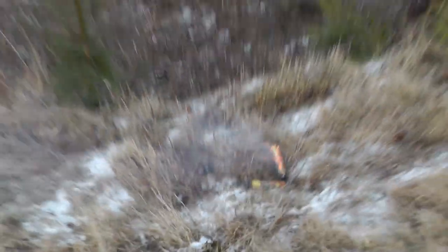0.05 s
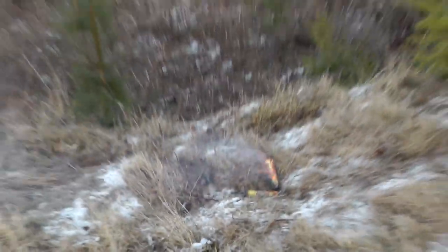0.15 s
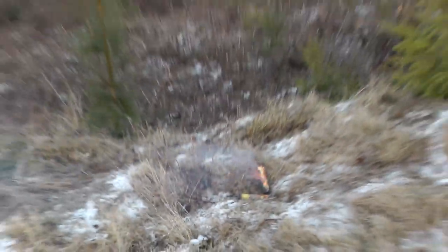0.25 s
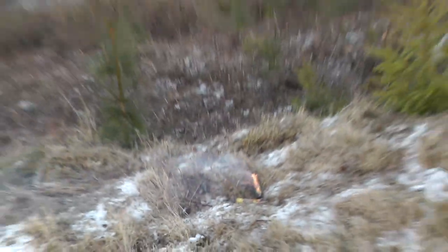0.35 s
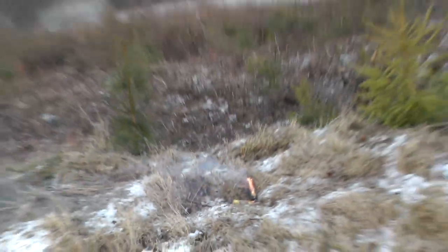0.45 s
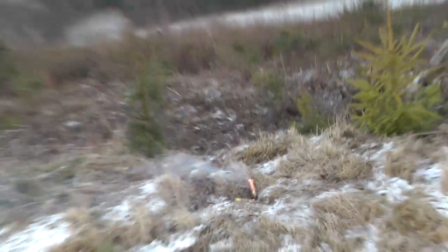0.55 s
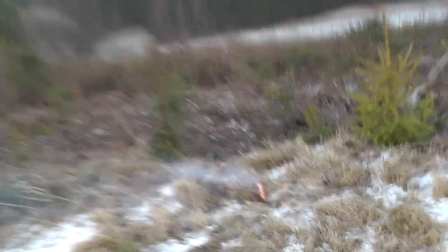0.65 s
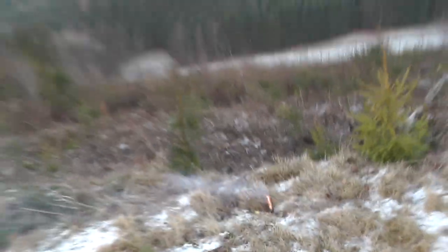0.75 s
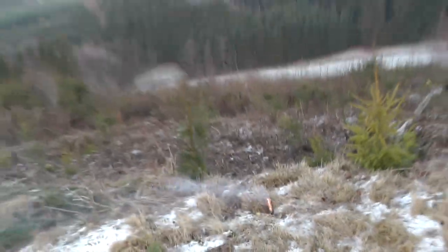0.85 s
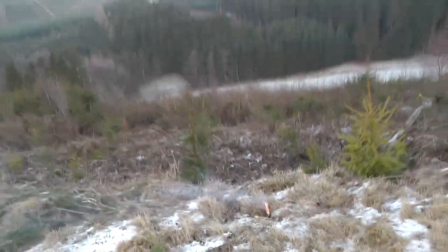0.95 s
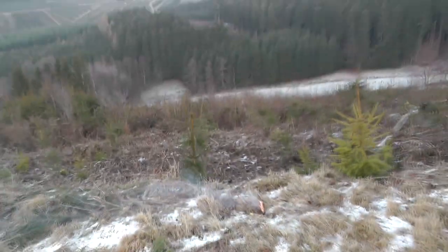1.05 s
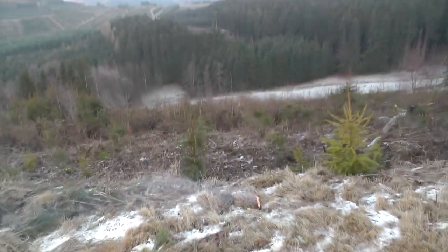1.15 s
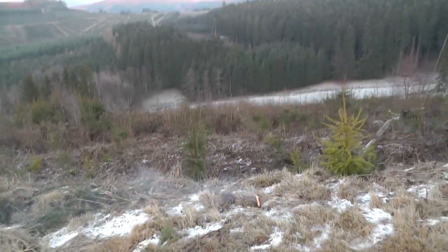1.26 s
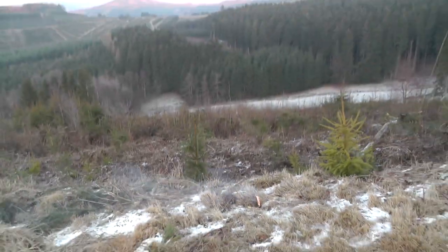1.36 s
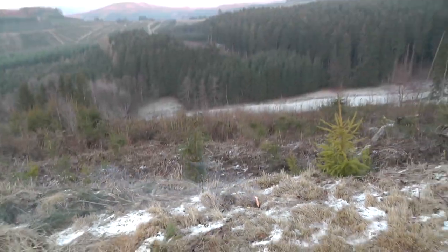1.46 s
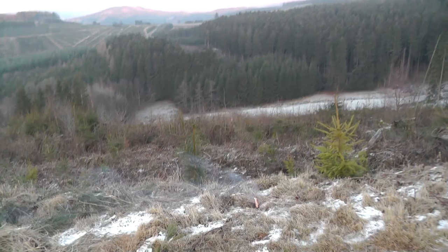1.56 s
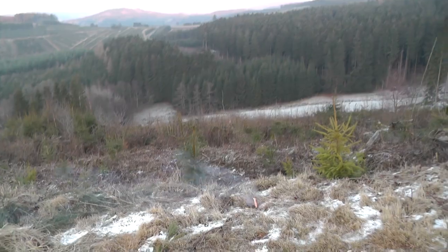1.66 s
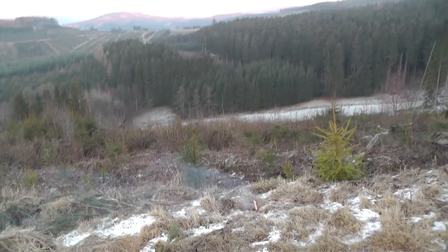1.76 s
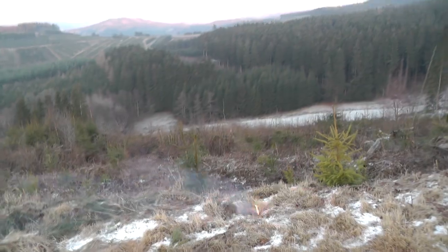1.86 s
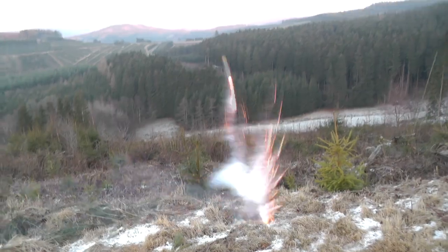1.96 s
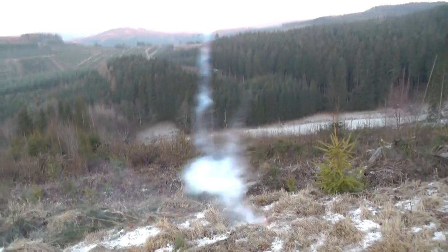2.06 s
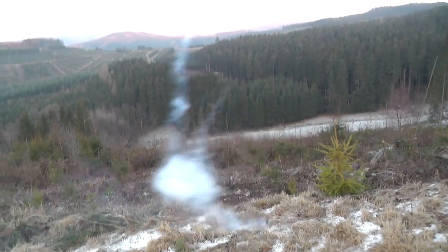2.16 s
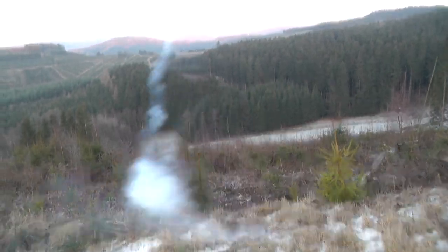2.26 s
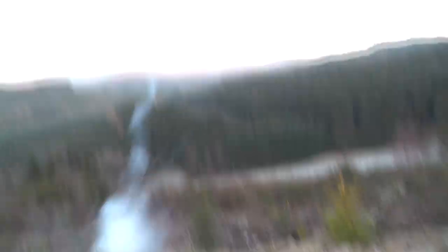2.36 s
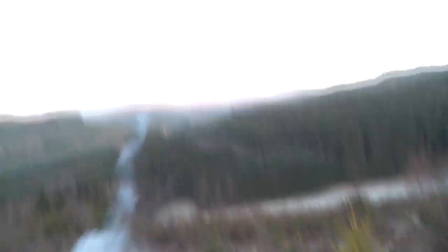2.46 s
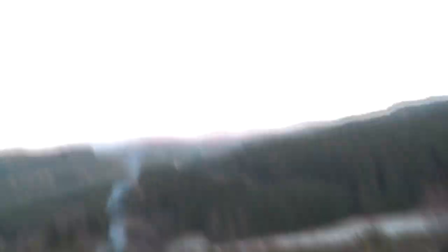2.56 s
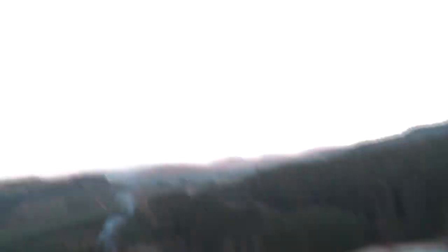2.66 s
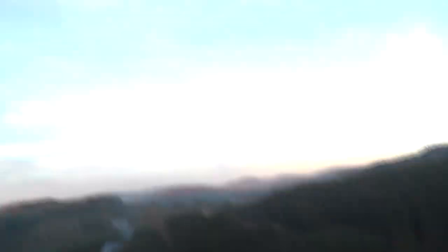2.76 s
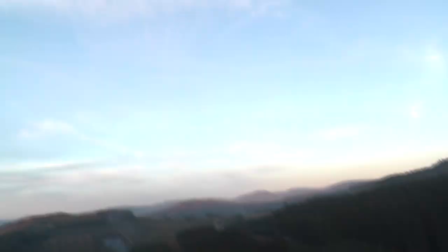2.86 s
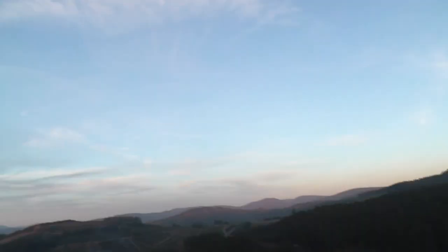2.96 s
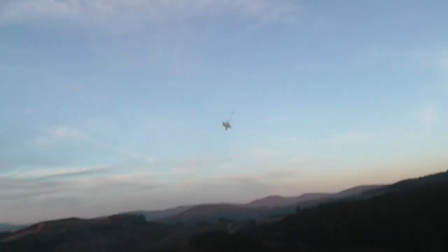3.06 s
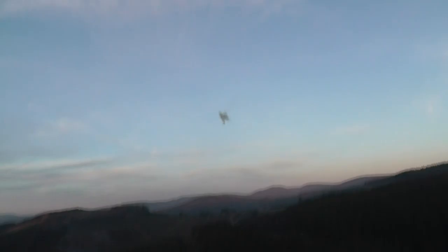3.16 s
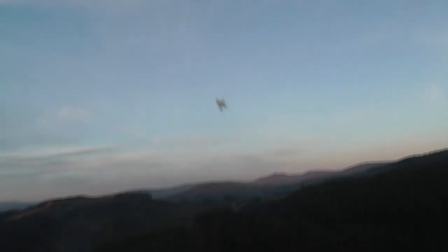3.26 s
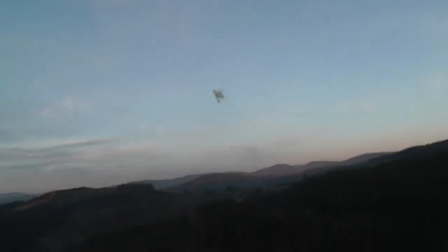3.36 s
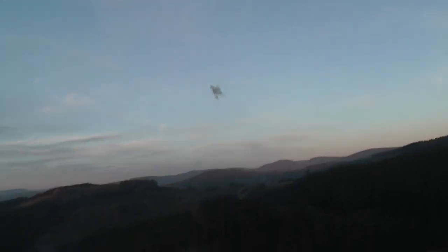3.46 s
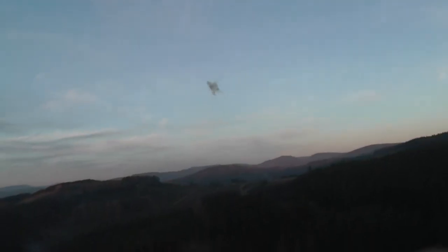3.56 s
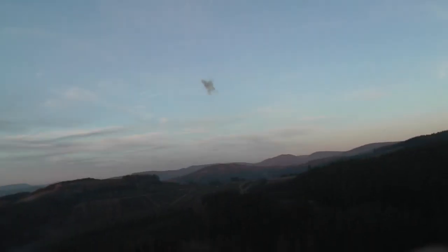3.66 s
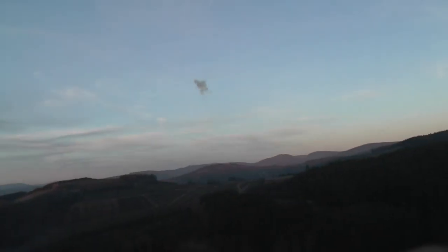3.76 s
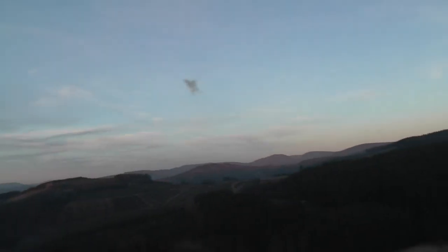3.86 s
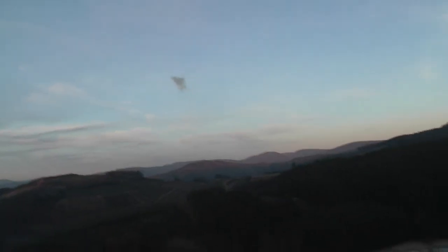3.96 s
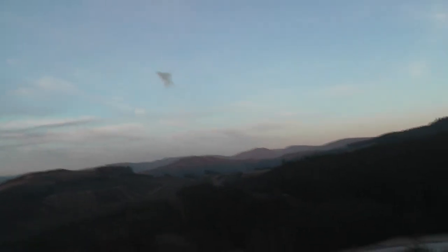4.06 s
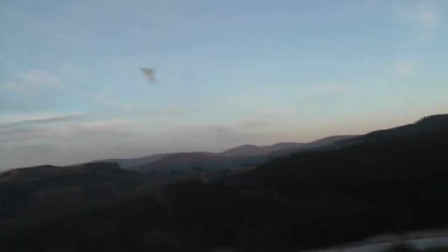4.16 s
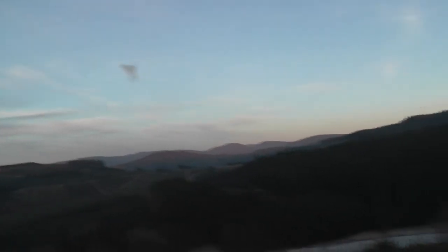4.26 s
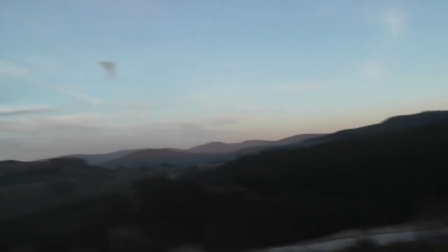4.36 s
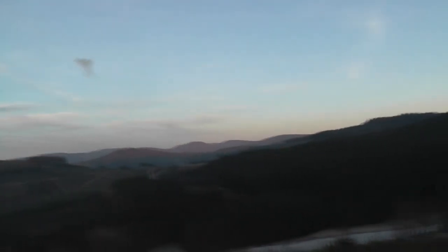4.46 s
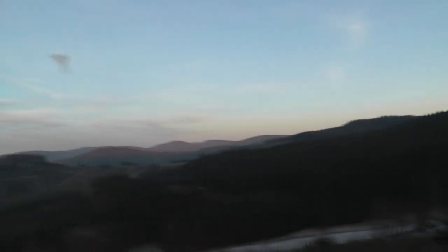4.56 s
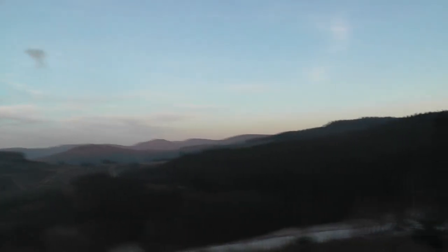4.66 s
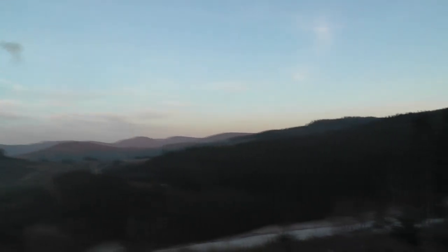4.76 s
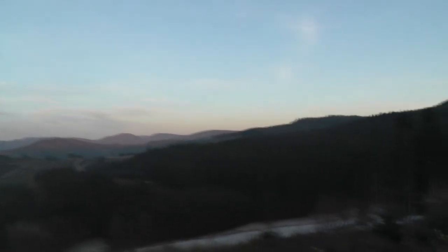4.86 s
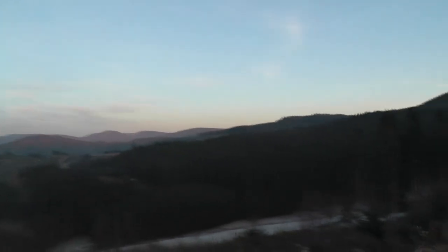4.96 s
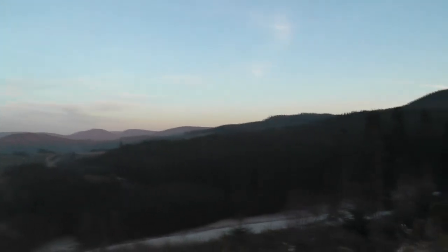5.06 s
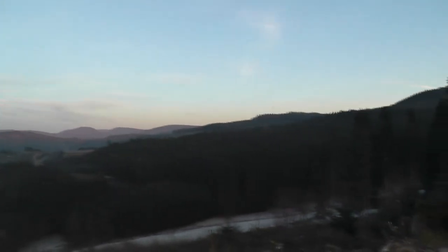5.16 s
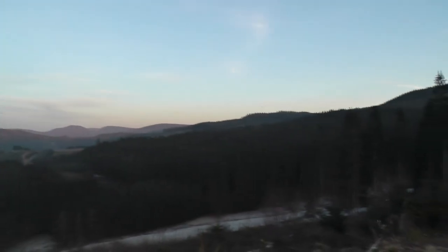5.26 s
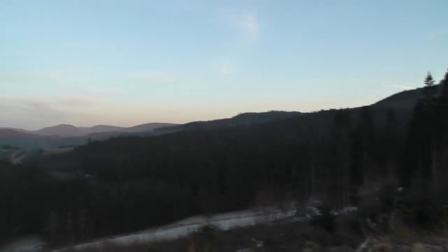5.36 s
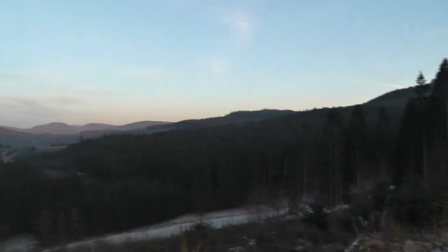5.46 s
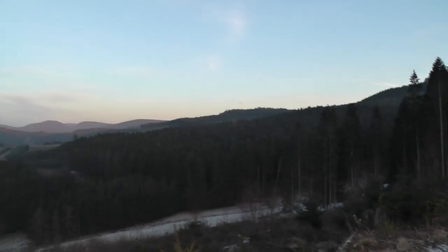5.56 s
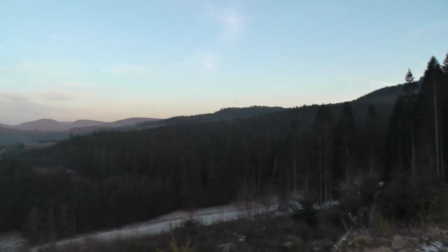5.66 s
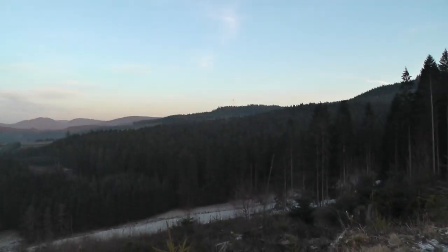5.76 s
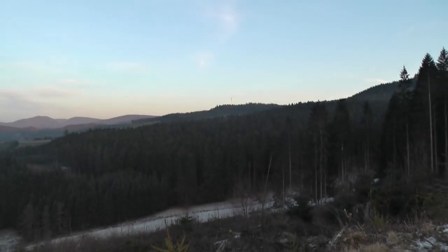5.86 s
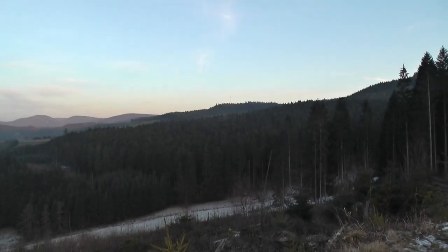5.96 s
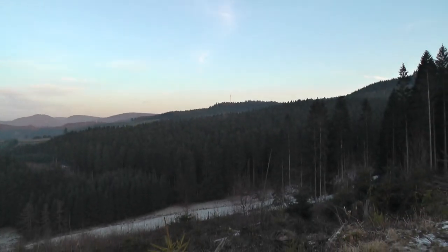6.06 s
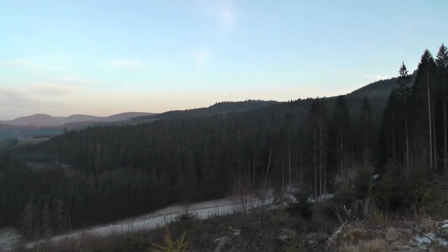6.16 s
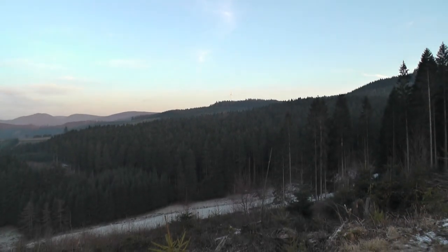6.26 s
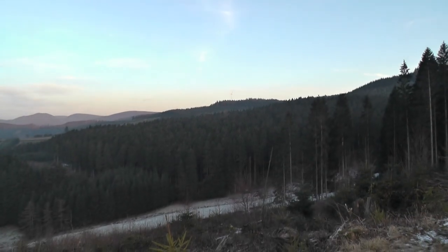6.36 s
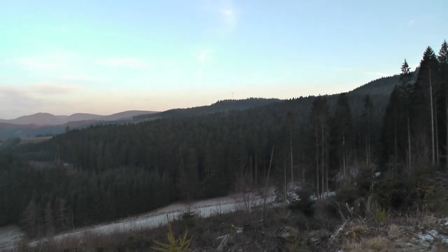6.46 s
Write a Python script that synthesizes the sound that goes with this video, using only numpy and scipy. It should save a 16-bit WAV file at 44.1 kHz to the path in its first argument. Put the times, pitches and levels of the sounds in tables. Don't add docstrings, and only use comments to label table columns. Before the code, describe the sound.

Hissing fuse and crunching steps outdoors, a short hard lift bang, a second later a huge overloaded explosion with a long, dulling echo across forested slopes.

```python
import sys
import numpy as np
from scipy import signal
from scipy.fft import rfft, irfft, next_fast_len
from scipy.io import wavfile
from scipy.ndimage import map_coordinates

SR = 44100
rng = np.random.default_rng(int(sys.argv[2]) if len(sys.argv) > 2 else 0)


def to_wav(s):
    ch = np.atleast_2d(s).T
    pcm = np.round(np.clip(ch, -1, 1) * 32767)
    wavfile.write(sys.argv[1], SR, pcm.astype(np.int16))


def invert_db(x):
    u = np.asarray(x, float) / 20
    return 10 ** u


N = 287355
t = np.arange(N) / SR


def unit(x):
    return x / np.sqrt(np.mean(x ** 2) + 1e-20)


def along(points, hz):
    f, v = np.transpose(points)
    return np.interp(np.log(hz + 1), np.log(f + 1), v)


def curves(rows):
    s, *cols = np.transpose(rows)
    return [np.interp(t, s, c) for c in cols]


def during(rows):
    return invert_db(curves(rows)[0]) * (t > rows[0][0]) * (t < rows[-1][0])


def swells(rows):
    power = 0
    for s, db, rise, fall in rows:
        away = np.maximum((s - t) / abs(rise), (t - s) / abs(fall))
        power = power + invert_db(db - 20 * away) ** 2
    return np.sqrt(power)


def sides(db):
    return invert_db(np.array([db, -db]) / 2)


def wobble(rate):
    knots = rng.standard_normal(int(N * rate / SR) + 4)
    return map_coordinates(knots, [t * rate])


def spread(mid, side, turn):
    return np.cos(turn) * mid + np.sin(turn) * np.array([side, -side])


def rush(spectrum, alike, spiky_db=0):
    sputter = np.repeat(rng.standard_normal(N // 32 + 1), 32)[:N]
    white = rng.standard_normal((2, N)) * invert_db(spiky_db * sputter)
    m = next_fast_len(N + 8192)
    colour = invert_db(along(spectrum, np.fft.rfftfreq(m, 1 / SR)))
    mid, side = irfft(rfft(white, m) * colour, m)[:, :N]
    return unit(spread(mid, side, np.arccos(np.clip(alike, -1, 1)) / 2))


def causal(db):
    cepstrum = irfft(np.log(invert_db(np.maximum(db, np.max(db) - 110))))
    half = len(cepstrum) // 2
    cepstrum[1:half] *= 2
    cepstrum[half + 1:] = 0
    pulse = irfft(np.exp(rfft(cepstrum)))[:half]
    return pulse / np.linalg.norm(pulse)


def shocks(rows):
    out = np.zeros((2, N))
    ms = np.arange(SR // 20) / SR * 1000
    for s, db, push, rise, pan_db in rows:
        wave = (1 - ms / push) * np.exp(-ms / push) * (1 - np.exp(-ms / rise))
        out[:, round(s * SR):][:, :len(ms)] += invert_db(db) * sides(pan_db)[:, None] * wave
    return signal.lfilter(*signal.butter(1, 4, "high", fs=SR), out)


# start_s [s], peak_db [dB over full scale], push_ms [ms], rise_ms [ms], left_minus_right_db [dB]
BURST_FRONTS = [(3.1715, 30, .4, .02, 0), (3.1733, 27, .42, .03, -3), (3.1744, 23, .6, .3, 2),
                (3.1754, 24, .6, .03, 0), (3.1783, 19, 1.0, .5, 0), (3.1808, 14, .8, .25, 1),
                (3.1821, 10, .6, .25, 3), (3.1833, 10, 1.2, .3, -3), (3.1861, 8, .8, .4, 0),
                (3.6974, 2, .4, .13, -5), (3.7003, -5, .4, .2, -6), (3.771, -2, .4, .15, -7),
                (3.9085, -8, .35, .12, -9)]


def burst():
    return shocks(BURST_FRONTS)


# start_s [s], peak_db [dB], push 1 or pull -1 [sign]
CLEAR_TRUNKS = [(3.1964, -3, 1), (3.3172, -5, -1), (3.3253, -4, -1), (3.3571, -1.5, -1), (3.5439, -8, -1),
                (3.5773, -5, -1), (3.6299, -8.5, 1), (3.6974, -2, 1), (3.7099, -5, 1), (3.7283, -3.5, 1),
                (3.7595, -2, 1), (3.771, -3, 1), (3.7801, -2.5, 1), (3.8179, -4, 1), (3.8437, -4, -1),
                (3.8982, -3, 1), (3.908, -2.5, 1), (3.9614, -5.5, -1), (4.0901, -5, 1), (4.1358, -5.5, -1),
                (4.1498, -5, 1), (4.1943, -6, 1), (4.3549, -2, 1), (4.4327, -4, 1), (4.779, -4, 1),
                (4.801, -5, -1), (5.004, -4, 1), (5.019, -3.5, 1), (5.969, -10, 1), (6.073, -11, 1)]
# start_s [s], end_s [s], trunks_per_s [1/s]
TREE_STANDS = [(3.19, 3.6, 20), (3.345, 3.365, 200), (3.612, 3.634, 140), (3.71, 3.82, 70),
               (3.83, 3.85, 160), (3.87, 3.93, 90), (3.947, 3.973, 160), (4.015, 4.1, 60),
               (4.135, 4.16, 130), (4.177, 4.24, 70)]


def trunks(pan_db):
    out = np.zeros((2, N))
    rows = list(CLEAR_TRUNKS)
    for start, end, rate in TREE_STANDS:
        draws = rng.random((int((end - start) * rate), 3))
        for k, (late, size, sign) in enumerate(draws):
            level_db = -7.5 + 3.5 * (size - .5)
            rows.append((start + (k + late) / rate, level_db, .7 - sign))
    for (s, db, sign), chance in zip(rows, rng.standard_normal(len(rows))):
        at = round(s * SR)
        trunk_pan_db = pan_db[at] - 1.5 + 1.5 * chance
        out[:, at] += np.sign(sign) * invert_db(db - 2.0) * sides(trunk_pan_db)
    return out


# time_s [s], level_db [dB], left_minus_right_db [dB]
YOUNG_TREES = [(3.2, -12.5, 0), (3.25, -15.3, -0.5), (3.33, -15.3, -0.5), (3.48, -16.6, -4),
               (3.63, -20.5, -3), (3.69, -25, -4)]
# time_s [s], level_db [dB], left_minus_right_db [dB]
FAR_HILLS = [(3.705, -18, -8.5), (3.9, -20, -5), (4.05, -16.5, -6), (4.45, -12.5, -2.5), (4.65, -14, -1.5),
             (5.35, -14.8, -1), (5.85, -22, 1), (5.98, -21, 0.5), (6.5, -28, 1.5)]
# time_s [s], path [-0.07 to 2.27, in the units of AIR_LOSS]
AIR_PATH = [(3.18, -.07), (3.72, .5), (4.1, .77), (4.5, 1.01), (5, 1.36), (5.5, 2), (6.5, 2.27)]
# pitch_hz [Hz], level_db [dB per Hz]
BLAST_COLOUR = [(40, -38), (110, -17), (180, -4), (300, -1), (560, 1), (850, -1), (1050, -5.5), (1350, -3),
                (1800, -7), (2500, -11), (5000, -17), (10000, -25), (14000, -31), (17000, -44)]
# pitch_hz [Hz], loss_db [dB per unit of path]
AIR_LOSS = [(600, 1), (850, 5), (1100, 7.5), (1700, 11), (2500, 18.5), (3500, 27), (5000, 37.5),
            (7000, 43.5), (10000, 66), (16000, 54)]
# pitch_hz [Hz], share [0-1]
THIN_TREE_LOSS = [(250, 1.0), (400, 0.85), (600, 0.02)]
# pitch_hz [Hz], level_db [dB]
TRUNK_COLOUR = [(100, -13.5), (300, -4.5), (700, -3), (1500, -6.5), (4000, -8.5), (16000, -13)]


def echoes():
    level_db, pan_db = curves(YOUNG_TREES + FAR_HILLS)
    path, = curves(AIR_PATH)
    bass_db = np.where(t < 3.7, np.clip(36 * (3.22 - t), -8.5, 0), -.7)
    after = np.maximum(t - BURST_FRONTS[3][0], 0)
    level_db = level_db + 6 * np.exp(-after / 0.0027)
    clumps_db = .45 * wobble(20) + (.9 + .9 * np.exp(-after / .8)) * wobble(130)
    turn = 0.15 + 0.48 * np.exp(-after / 0.77)
    mid, side = rng.standard_normal((2, N))
    leaves = spread(mid, side, turn)
    leaves = leaves * invert_db(level_db + clumps_db - 0.06) * sides(pan_db) * (after > 0)
    solid = trunks(pan_db)

    hz = np.fft.rfftfreq(2048, 1 / SR)
    block = 1536
    out = np.zeros((2, N + 4096))
    for i in range(round(BURST_FRONTS[0][0] * SR), N, block):
        colour_db = along(BLAST_COLOUR, hz) - path[i] * along(AIR_LOSS, hz)
        colour_db = colour_db + bass_db[i] * along(THIN_TREE_LOSS, hz)
        rustle = causal(colour_db)
        knock = causal(colour_db + along(TRUNK_COLOUR, hz))
        knock = knock / np.max(knock)
        part = signal.fftconvolve(leaves[:, i:i + block], rustle[None], axes=1)
        part += signal.fftconvolve(solid[:, i:i + block], knock[None], axes=1)
        out[:, i:i + part.shape[1]] += part
    return out[:, :N]


# start_s [s], peak_db [dB over full scale], push_ms [ms], rise_ms [ms], left_minus_right_db [dB]
LIFT_FRONTS = [(1.9676, 6, 1.0, .5, 0), (1.9701, 8, .8, .4, 0), (1.9728, 5, .35, .05, 0),
               (1.9752, -1, .5, .2, 0), (1.9784, 15, .6, .05, 0), (1.9802, 6, 1.1, .15, 0),
               (1.9821, -1, 1.3, .2, 0)]
# time_s [s], level_db [dB]
FLAME_LEVEL = [(1.948, -37), (1.956, -41), (1.967, -19), (1.9695, -11), (1.9788, -5), (1.9797, -33),
               (1.988, -42), (1.997, -39), (2.02, -86)]
# pitch_hz [Hz], level_db [dB per Hz]
FLAME_COLOUR = [(300, -28), (800, -5.5), (2200, -0.5), (4500, -8.5), (7000, -3.5), (11000, -12.5),
                (16000, -16)]
# delay_s [s], level_db [dB], left_minus_right_db [dB]
BACK_SLOPE = [(.0166, -32, 14), (.0128, -33, -8)]
# pitch_hz [Hz], level_db [dB per Hz]
RUMBLE_COLOUR = [(80, -30), (170, -7), (300, -4), (450, 0), (900, -14), (2500, -18), (6000, -44)]


def lift():
    fronts = shocks(LIFT_FRONTS)
    flame = during(FLAME_LEVEL) * rush(FLAME_COLOUR, 0.78, spiky_db=4.5)
    after = np.maximum(t - LIFT_FRONTS[-1][0], 0)
    rumble_gain = invert_db(-18 - 60 * after / 0.062) * (after > 0)
    rumble = rumble_gain * rush(RUMBLE_COLOUR, 0.79)
    answer = np.zeros((2, N))
    for s, db, pan_db in BACK_SLOPE:
        answer += invert_db(db) * sides(pan_db)[:, None] * np.roll(fronts, round(s * SR), axis=1)
    return fronts + flame + rumble + answer


# time_s [s], level_db [dB]
FUSE_LEVEL = [(0, -37), (.88, -38.5), (1.6, -41.5), (1.95, -47.5)]
# pitch_hz [Hz], level_db [dB per Hz]
FIZZ_COLOUR = [(710, -48.5), (1200, -11), (1510, -4.5), (1640, -6), (1890, -4.5), (2730, -5.5), (3700, -7),
               (6720, -2), (12700, -4.5), (16000, -11)]
# peak_s [s], level_db [dB above the hiss]
SPARK_SPURTS = [(.93, 2.2), (1.36, 2.5), (1.45, 4.5), (1.68, 2.5), (1.86, 2)]


def fuse():
    rise_s, fall_s = 0.033, 0.11
    spurt_db = 0
    for s, db in SPARK_SPURTS:
        away = np.maximum((s - t) / rise_s, (t - s) / fall_s)
        spurt_db = spurt_db + db * np.exp(-away)
    flicker_db = 0.68 * wobble(12.8)
    return during(FUSE_LEVEL) * invert_db(spurt_db + flicker_db) * rush(FIZZ_COLOUR, 0.94, spiky_db=1.0)


# start_s [s], level_db [dB], length_s [s], pitch_hz [Hz], spread [octaves]
BOOT_STEPS = [(0.175, -38.5, 0.06, 520, 1.43), (0.24, -49, 0.05, 1800, 0.84), (0.36, -41, 0.014, 1010, 1.4),
              (0.746, -37, 0.052, 1150, 0.8), (0.87, -38, 0.076, 1300, 0.6), (0.944, -43, 0.041, 350, 0.71),
              (0.979, -44, .02, 1190, 0.44), (1.153, -43, 0.028, 1190, 0.75),
              (1.246, -39.5, .016, 320, 0.6), (1.434, -41, 0.038, 1110, 1.24),
              (1.628, -37.5, 0.03, 620, 0.9), (1.661, -45.5, 0.045, 1490, 1),
              (2.122, -49.5, 0.059, 1300, 0.72), (2.142, -54.5, 0.073, 10000, .4),
              (2.208, -44, 0.018, 553, 0.32), (2.301, -50.5, 0.098, 1700, 0.52),
              (2.534, -37, 0.0066, 1200, 0.74), (2.545, -42, .13, 1180, 0.93),
              (2.679, -35.5, .025, 530, 0.55), (2.699, -33, 0.02, 1450, 0.22),
              (2.684, -47, .045, 4470, 0.5), (2.723, -40, 0.0077, 1100, 0.76),
              (2.736, -43, 0.013, 1500, .3), (3.541, -43, 0.035, 10000, .3)]


def steps():
    out = np.zeros((2, N + 4096))
    u = np.arange(400) / SR
    for s, db, length, hz, octaves in BOOT_STEPS:
        count = int(np.clip(25 + 4000 * length, 5, 300))
        where, later, pitch, size, pan = rng.random((5, 300))[:, :count]
        f = hz * 2 ** (0.594 * octaves * np.log(pitch / (1 - pitch)))
        f = np.clip(f, 80, 13000)[:, None]
        life = u * f / 0.92
        strength = (-np.log(size[:, None])) ** 0.78 * np.sqrt(f / hz)
        grains = np.sin(2 * np.pi * f * u) * life * np.exp(-life) * strength
        begin = (length * where * (.8 + .2 * later) * SR).astype(int)
        at = begin[:, None] + np.arange(len(u))
        scale = invert_db(db) * np.sqrt(length * SR / np.sum(grains ** 2))
        for side, gain in zip(out, sides(-1.5 + 14 * (pan - .5))):
            crunch = np.bincount(at.ravel(), (grains * gain[:, None]).ravel())
            side[round(s * SR):][:len(crunch)] += scale * crunch
    return out[:, :N]


# start_s [s], peak_db [dB], left_minus_right_db [dB]
STALK_SNAPS = [(0.242, -24, -1.5), (0.366, -23, -1.0), (0.777, -21, -5.0), (1.251, -30, 0.5),
               (2.532, -24, -3.5)]


def stalks():
    push_ms, rise_ms = .2, .05
    return shocks([(s, db + 7, push_ms, rise_ms, pan_db) for s, db, pan_db in STALK_SNAPS])


# peak_s [s], level_db [dB], rise_s [s], fall_s [s]
GRASS_BRUSHES = [(2.032, -58, .03, .05), (2.192, -47.5, .15, .3), (2.448, -45.5, 0.28, 0.58),
                 (2.7, -44.5, 0.58, 0.41), (2.94, -54, .05, .35), (4.2, -61, .05, .6),
                 (4.51, -54, .18, .35), (4.85, -58, .3, .4), (5.15, -57, .1, .025), (5.37, -62, .2, .3),
                 (6.16, -47, 0.059, .15), (6.27, -64, .025, .15), (6.45, -50.5, .03, .12)]
# pitch_hz [Hz], level_db [dB per Hz]
SWISH_COLOUR = [(1470, -10), (2500, -7.5), (4760, -11), (6920, -7.5), (8730, -14), (11300, -12.5),
                (16000, -27.5)]


def grass():
    return swells(GRASS_BRUSHES) * rush(SWISH_COLOUR, .3, spiky_db=1.5)


# time_s [s], level_db [dB]
WIND_GUSTS = [(0, -44.5), (.36, -43), (1.31, -47), (1.83, -47), (2.05, -52.5), (2.56, -41.5), (2.83, -43),
              (3.1, -48), (3.3, -37), (3.77, -46.5), (4.28, -42), (5.3, -37.5), (5.95, -44.5), (6.52, -42)]
# pitch_hz [Hz], level_db [dB per Hz]
BUFFET_COLOUR = [(15, -3), (30, -1.5), (60, -1.5), (100, -6.5), (250, -17), (500, -21.5), (1000, -56.5)]


def wind(gust_db):
    lumps = invert_db(2.95 * np.array([wobble(12), wobble(10)]))
    return invert_db(gust_db + 6) * unit(lumps * rush(BUFFET_COLOUR, .05))


# peak_s [s], level_db [dB], rise_s [s], fall_s [s]
CROWN_SWAYS = [(.67, -45.5, 2.5, 2.2), (1.4, -49, 1.5, 1.2), (2.03, -46, .5, 1.2), (2.634, -39.5, .7, .35),
               (6.3, -47.5, 4, 3)]
# pitch_hz [Hz], level_db [dB per Hz]
TREE_AIR_COLOUR = [(88, -25.5), (150, -6), (220, -14), (286, -8.5), (456, -16), (871, -16.5), (2340, -28),
                   (4000, -33), (5200, -52), (8800, -120)]


def trees(gust_db):
    far = invert_db(-51 + .2 * (gust_db - gust_db.mean()))
    gain = np.hypot(far, swells(CROWN_SWAYS))
    return gain * invert_db(1.6 * wobble(12)) * rush(TREE_AIR_COLOUR, 0.55)


# pitch_hz [Hz], level_db [dB per Hz]
HISS_COLOUR = [(2350, -42), (4000, -3), (4730, 2), (6400, 2.5), (14800, 1), (16000, -5.5)]


def microphone_hiss():
    return invert_db(-55) * rush(HISS_COLOUR, 0)


def scene():
    gust_db, = curves(WIND_GUSTS)
    blasts = burst() + echoes() + lift()
    nearby = fuse() + steps() + stalks() + grass()
    return blasts + nearby + wind(gust_db) + trees(gust_db) + microphone_hiss()


def band_limit(x):
    return signal.sosfilt(signal.butter(12, 15900, fs=SR, output="sos"), x)


def record(dry):
    overloaded = dry / (1 + np.abs(dry / 1.03) ** 14) ** (1 / 14)
    coupled = signal.lfilter(*signal.butter(1, 3, "high", fs=SR), overloaded)
    return band_limit(np.clip(coupled, -1, 1))


dry = scene()
out = record(dry)
to_wav(out)
```